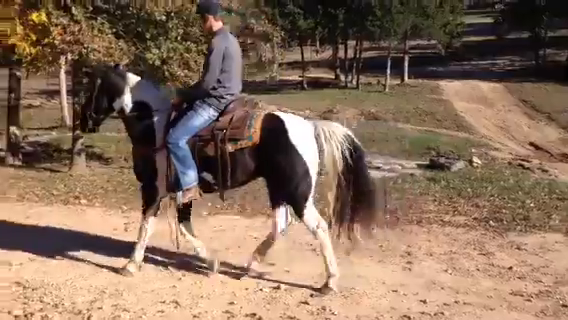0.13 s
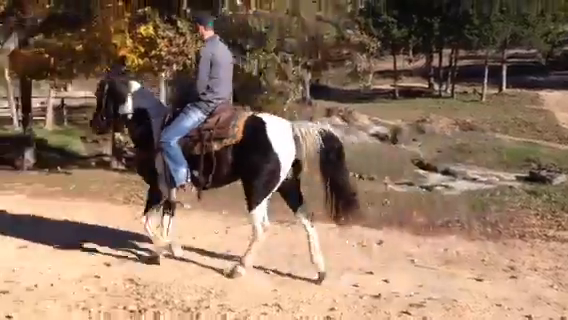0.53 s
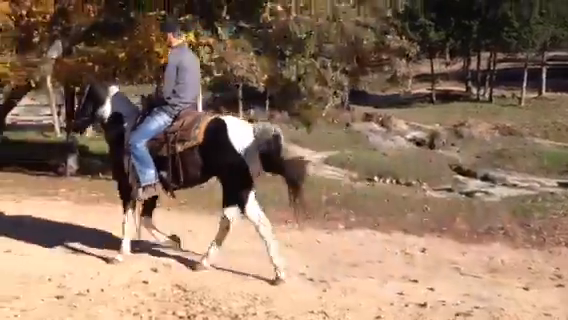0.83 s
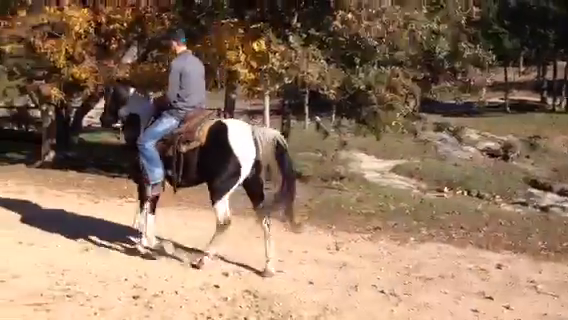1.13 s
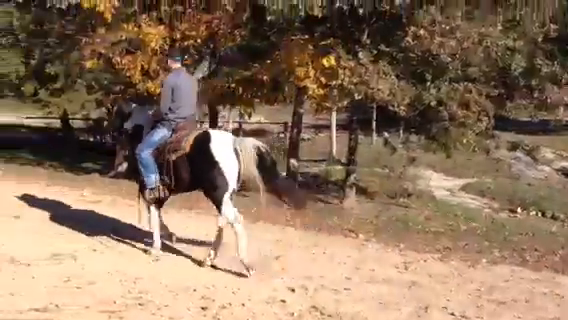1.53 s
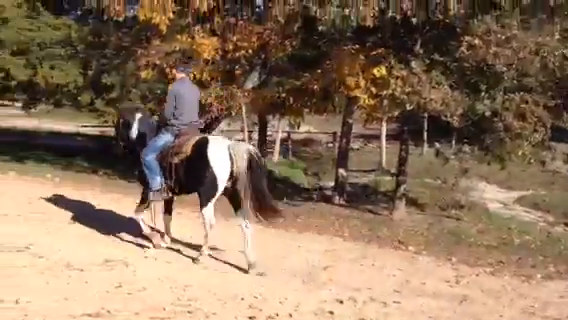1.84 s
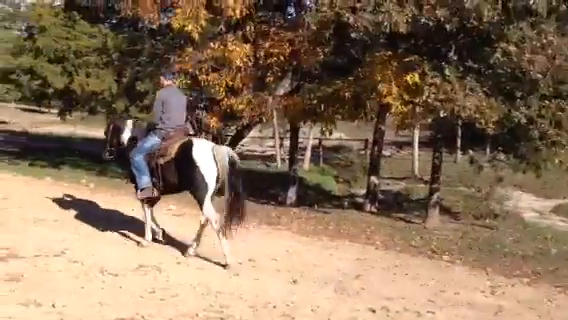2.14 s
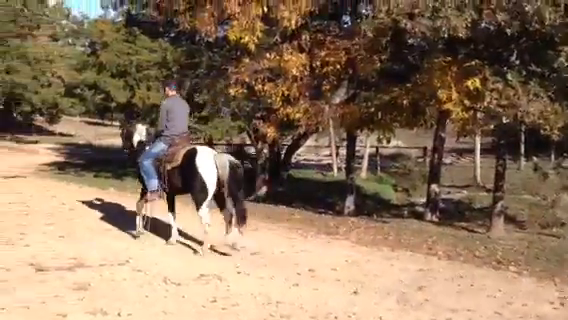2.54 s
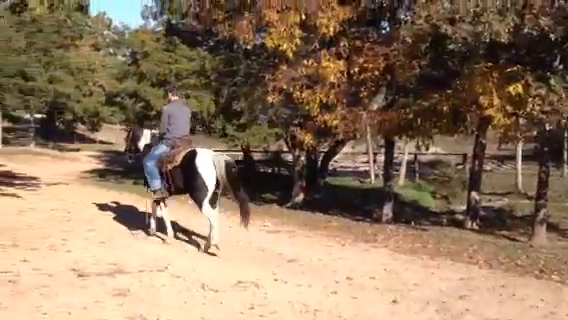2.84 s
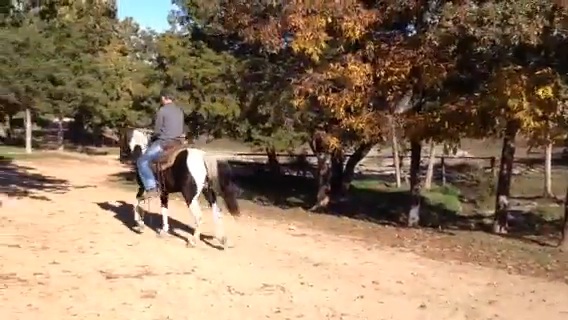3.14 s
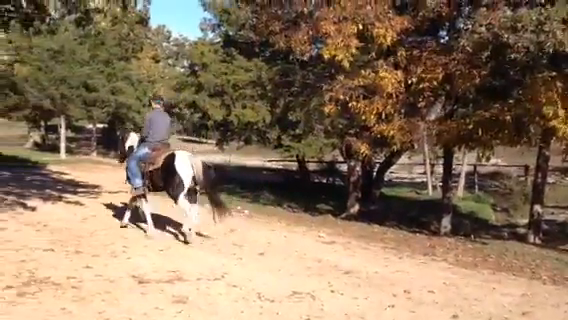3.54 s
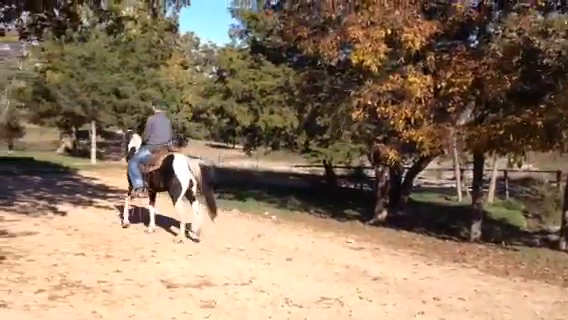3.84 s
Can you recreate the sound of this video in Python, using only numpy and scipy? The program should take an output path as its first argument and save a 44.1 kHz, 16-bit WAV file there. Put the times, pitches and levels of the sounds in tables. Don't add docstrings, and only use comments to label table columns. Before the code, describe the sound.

A horse's hooves move briskly over sand and stones, close at first, with gritty crunches, dull thuds, pebble ticks and dragging sand. Hollow knocks stand out near 0.3, 1.3 and 1.8 s, and a tiny metal tink at 0.9. Steps soften with distance, but a sharp stone crack hits at 3.1 and a knock at 3.8. Faint leaves and crickets continue; light low wind begins at 3.5.

```python
import sys
import numpy as np
from scipy import signal
from scipy.io import wavfile
from scipy.ndimage import uniform_filter1d

SR = 44100
rng = np.random.default_rng(int(sys.argv[2]) if len(sys.argv) > 2 else 0)


def put_to_file(sound):
    columns = np.atleast_2d(sound).T
    safe = np.clip(columns, -1, 1)
    whole_steps = np.round(safe * 32767)
    wavfile.write(sys.argv[1], SR, whole_steps.astype(np.int16))


def voltage_ratio(level):
    return 10 ** (np.asarray(level, float) / 20)


N = 176400


def evened(x):
    return x / np.sqrt(np.mean(x ** 2) + 1e-20)


def peaked(x):
    return x / (abs(x).max() + 1e-12)


def add(mix, s, sound):
    part = mix[round(s * SR):][:len(sound)]
    part += sound[:len(part)]


def colour(x, points):
    f, db = np.transpose(points)
    bins = abs(np.fft.fftfreq(4096, 1 / SR)) + 1
    gain = np.log(voltage_ratio(np.interp(np.log(bins), np.log(f), db)))
    taps = np.fft.ifft(np.exp(gain - 1j * signal.hilbert(gain).imag)).real[:2048]
    return signal.oaconvolve(x, taps / np.linalg.norm(taps))[:len(x)]


def resonate(x, hz, width_hz):
    turn = np.exp(2j * np.pi * np.cumsum(hz * np.ones(len(x))) / SR)
    r = np.exp(-np.pi * width_hz / SR)
    return 2 * (turn * signal.lfilter([1 - r], [1, -r], x / turn)).real


def grains(count, per_s, spread_db):
    chance, size, sign = rng.random((count, 3)).T
    return (chance < per_s / SR) * voltage_ratio(-spread_db * np.log(size + 1e-3)) * np.sign(sign - 0.5)


# f/Hz, level/dB per Hz
HUSH_SPECTRUM = [(100, -0.5), (200, 2.5), (450, -8.5), (800, -5), (2200, -11), (5200, -25), (9800, -17.5),
                 (10500, -31.5), (15500, -51)]
HUSH_DB, BREEZE_DB = -59, -58.5
BREEZE_S = 3.5


def hush():
    swell_db = evened(uniform_filter1d(rng.standard_normal(N), size=9000))
    leaves = evened(colour(rng.standard_normal(N), HUSH_SPECTRUM))
    rise = np.clip((np.arange(N) / SR - BREEZE_S) / 0.054, 0, 1)
    gust = evened(resonate(rng.standard_normal(N), 94, 41)) * rise
    return voltage_ratio(HUSH_DB + 0.96 * swell_db) * leaves + voltage_ratio(BREEZE_DB + 0.84 * swell_db) * gust


# t/s, length/s, level/dB, f/Hz
CRICKETS = [(0.052, 0.16, -66, 3780), (0.222, 0.45, -58, 4330), (.3, 0.26, -65, 4120),
            (1.261, 0.43, -58, 4296), (1.66, 0.24, -61.5, 4100), (1.852, 0.37, -61, 3935),
            (2.205, 0.33, -59, 4340), (2.483, 0.38, -59, 4230), (2.801, 0.92, -71, 4200),
            (3.243, 0.34, -58.5, 4290), (3.559, 0.33, -72, 4210), (3.76, 0.25, -53, 4253)]
TRILL_PER_S, TRILL_DEPTH, CHORUS_DB = 70, 0.38, -64


def crickets():
    far = colour(rng.standard_normal(N), [(3300, -24.0), (3800, -2.0), (4650, -4), (4950, -22.0)])
    out = voltage_ratio(CHORUS_DB) * evened(far)
    for s, length, db, hz in CRICKETS:
        noise = rng.standard_normal(int(length * SR))
        t = np.arange(len(noise)) / SR
        gate = 1 + TRILL_DEPTH * np.tanh(2 * np.sin(2 * np.pi * TRILL_PER_S * t))
        fuzz = evened(resonate(resonate(noise, hz, 180), hz, 230))
        wavering_hz = hz + 50 * evened(uniform_filter1d(noise, size=600))
        tone = np.sin(2 * np.pi * np.cumsum(wavering_hz) / SR)
        swell = np.sin(np.pi * t / length) ** 0.45
        add(out, s, voltage_ratio(db) * swell * gate * (0.69 * fuzz + tone))
    return out


# t/s, peak level/dB, f/Hz
PEBBLES = [(0.1566, -45.5, 9400), (0.216, -39, 6000), (0.2253, -39, 6230), (.265, -41, 9000),
           (.291, -44, 9500), (.351, -37.5, 1060), (.376, -47, 2200), (.4256, -55, 8700),
           (0.4403, -43, 8600), (0.47, -37.5, 1510), (0.554, -35, 5000), (0.5901, -21.5, 8540),
           (.5955, -38, 1390), (0.7876, -46, 10000), (0.8235, -45, 8400), (0.823, -44, 704),
           (.901, -33, 2300), (1.3933, -34.5, 4100), (1.5775, -44, 11000), (1.0881, -47, 10400),
           (1.1015, -49, 12000), (1.1078, -34.5, 3450), (1.137, -61, 11300), (1.201, -42, 8050),
           (1.2765, -27, 8200), (1.467, -41, 9400), (1.7411, -56, 3000), (1.7932, -23, 2600),
           (1.804, -39, 6500), (1.813, -29, 1800), (1.8203, -31, 744), (1.8803, -42, 9000),
           (1.892, -56, 1300), (1.911, -54, 13500), (1.938, -46, 8450), (1.945, -42, 1500),
           (2.028, -42, 2500), (2.0832, -31, 8600), (2.0835, -37, 1980), (2.205, -37, 2460),
           (2.469, -48, 4500), (2.514, -39, 880), (2.889, -42.5, 2000), (3.155, -29, 1320),
           (2.3444, -44, 2010), (2.364, -44, 2000), (2.559, -52, 8000), (3.173, -36, 4300),
           (3.358, -48, 8360), (3.5071, -43, 8900), (3.729, -41.5, 2000), (3.735, -42, 3500),
           (3.789, -42, 2000), (3.8, -38, 2220), (3.901, -39.5, 2500), (3.962, -61, 4930)]
BRIGHT_HZ = 9000


def pebbles():
    out, t = np.zeros(N), np.arange(400) / SR
    for s, db, hz in PEBBLES:
        tap = rng.standard_normal(len(t)) * np.exp(-t / 0.00057)
        ring = resonate(resonate(tap, hz, 350 + 0.086 * hz), hz, 1.0 * hz + 600)
        snap = 0.11 * (hz / BRIGHT_HZ) ** 2 * peaked(np.diff(tap, prepend=0))
        add(out, s, voltage_ratio(db) * peaked(peaked(ring) + snap))
    return out


WALL_TOP_HZ = 2500


def hoof(x, hz):
    low = resonate(resonate(x, hz, 0.19 * hz), hz, 4.5 * hz)
    wall = resonate(resonate(x, 0.5 * hz, 960), min(2.4 * hz, WALL_TOP_HZ), 1240)
    return peaked(peaked(low) + 0.59 * peaked(wall))


# t/s, peak level/dB, hoof ring f/Hz, grit level/dB
CRUNCHES = [(0.189, -26.5, 867, -21), (0.196, -28, 1670, -7), (0.257, -31.5, 754, -24),
            (0.5094, -34, 690, -8), (0.515, -35, 770, -1.5), (0.533, -27, 735, -18),
            (0.573, -27.5, 870, -20), (0.592, -29.5, 1470, -8.5), (0.613, -37.5, 910, -5),
            (0.845, -37.5, 1530, -2), (0.849, -29, 810, -6.5), (0.9, -30.5, 800, -21),
            (0.942, -29, 770, -14), (0.952, -36, 990, -11), (0.959, -30.5, 750, -11),
            (1.013, -38.5, 735, -13.5), (1.043, -36.5, 666, -12), (1.1, -38, 2460, -39),
            (1.169, -31.5, 1920, -48), (1.174, -25.5, 1950, -41), (1.235, -28.5, 1640, -33),
            (1.392, -32, 845, -20), (1.492, -35.5, 830, -13), (1.519, -37.5, 1550, -24),
              (1.564, -31.5, 780, -12.5), (1.624, -28, 740, -11), (1.868, -34.5, 830, -22),
              (2.035, -38.5, 1350, -7.5), (2.081, -43.5, 1880, -13), (2.108, -31, 1880, -17.5),
              (2.118, -37, 1930, -18), (2.195, -31.5, 820, -12), (2.2504, -33, 860, -6.5),
              (2.2564, -27, 620, -31), (2.295, -36, 880, -12), (2.501, -33, 640, -13),
              (2.581, -44, 1480, -10), (2.603, -31, 720, -14.5),
            (2.736, -40, 988, -15), (2.755, -42.5, 1180, -2.5), (2.825, -43.5, 1900, -7),
              (2.88, -39.5, 1190, -3), (3.037, -36, 1210, -14), (3.048, -32.5, 2220, -9),
              (3.144, -30, 1260, -5), (3.157, -27, 750, -5), (3.211, -34, 1190, -34),
              (3.364, -37, 1920, -19), (3.397, -38.5, 647, -2.5), (3.427, -41.5, 614, -5),
              (3.502, -44, 764, -13), (3.529, -36.5, 726, -26), (3.709, -36.5, 1800, -9.5),
              (3.832, -28.5, 990, -29), (3.863, -33.5, 1120, -12)]
# f/Hz, level/dB per Hz
GRIT = [(600, 9), (2300, 5.5), (4200, 19.5), (6000, 7.5), (9700, 15.5), (11000, 0.5), (13600, 7),
        (15500, -23)]
CRUNCH_S = 0.0052


def crunches():
    ring, grit, t = np.zeros(N), np.zeros(N), np.arange(SR // 20) / SR
    u = t / CRUNCH_S
    shape = np.minimum(u / 0.51, 1) * (np.exp(-u ** 2) + 0.44 * np.exp(-u / 2.8))
    for s, db, hz, grit_db in CRUNCHES:
        clump = np.tanh(grains(len(t), per_s=6800, spread_db=4.0) / 1.54) * shape
        hiss = clump * 0.97 + 0.34 * shape * rng.standard_normal(len(t))
        add(ring, s - 0.0015, voltage_ratio(db - 0.5) * hoof(clump, hz))
        add(grit, s - 0.001, voltage_ratio(db + grit_db + 5) * peaked(hiss))
    return ring + colour(grit, GRIT)


# t/s, peak level/dB, f/Hz
THUDS = [(0.192, -45.5, 310), (0.296, -44.5, 347), (0.44, -38, 302), (0.753, -47.5, 345), (0.847, -40, 205),
         (0.95, -42, 243), (1.058, -48.5, 270), (1.291, -40, 225), (1.49, -47, 215), (1.734, -40, 268),
         (1.923, -45.5, 285), (2.253, -43, 174), (2.418, -52, 200), (2.567, -48.5, 269), (2.953, -50, 198),
         (3.049, -46, 238), (3.582, -52, 407), (3.712, -37.5, 185)]


def thuds():
    out, t = np.zeros(N), np.arange(SR // 10) / SR
    for s, db, hz in THUDS:
        push = np.sin(2 * np.pi * hz * t * (1 - 0.41 * t)) * np.exp(-t / 0.013)
        noise = rng.standard_normal(len(t))
        rumble = evened(resonate(noise, 0.71 * hz, 72)) * np.exp(-t / 0.025)
        body = evened(resonate(resonate(noise, 550, 180), 550, 260)) * np.exp(-t / 0.021)
        onset = np.minimum(t / 0.0024, 1)
        add(out, s, voltage_ratio(db + 3.0) * onset * (1.2 * push + 0.5 * rumble + 0.24 * body))
    return out


# t/s, length/s, coarse level/dB, fine spray level/dB
DRAGS = [(0.203, 0.28, -49, -60), (0.509, 0.15, -42, -51.5), (0.837, 0.12, -46.5, -51),
         (1.1, 0.31, -43.5, -54.5), (1.485, 0.27, -54.5, -56), (1.785, 0.18, -43.5, -51.5),
         (2.067, 0.6, -51, -60), (2.417, 0.063, -50.5, -56), (2.555, 0.069, -48, -54.5),
         (0.663, 0.047, -60, -64), (2.715, 0.65, -56.5, -65), (3.106, 0.1, -41.5, -39),
         (3.355, 0.12, -53.5, -56.5), (3.497, 0.056, -43, -48.5), (3.783, 0.18, -47, -58)]
# f/Hz, level/dB per Hz
SAND = [(150, 5), (400, -2.5), (850, -2), (2300, -2), (3300, -19), (4500, -10.5), (6000, -20), (15500, -27)]


def drags():
    t, coarse, fine = np.arange(N) / SR, np.zeros(N), np.zeros(N)
    for s, length, db, fine_db in DRAGS:
        u = np.maximum(t - s, 0) / length
        stroke = voltage_ratio(-8.0 * u ** 0.48) * np.minimum(u * length / 0.0056, 1) / (1 + u ** 6)
        coarse += voltage_ratio(db) * stroke
        fine += voltage_ratio(fine_db) * stroke
    lumps = voltage_ratio(3 * evened(uniform_filter1d(rng.standard_normal(N), size=400)))
    contacts = evened(np.tanh(grains(N, per_s=5000, spread_db=4.5) / 6))
    sand = lumps * (contacts + 0.61 * rng.standard_normal(N))
    return coarse * evened(colour(sand, SAND)) + fine * evened(colour(sand[::-1], GRIT))


# t/s, peak level/dB, f/Hz
KNOCKS = [
    (0.226, -25.5, 990),
    (0.2998, -18.5, 1020),
    (1.297, -19.5, 980),
    (1.7965, -18, 1580),
    (1.9292, -27.5, 730),
    (2.421, -29.5, 850),
    (3.1317, -26, 2930),
    (3.8411, -23, 1120),
]
LEAD_S = 0.008


def knocks():
    ring, grit, t = np.zeros(N), np.zeros(N), np.arange(SR // 20) / SR
    for s, db, hz in KNOCKS:
        blow = (t >= LEAD_S) * np.exp(-abs(t - LEAD_S) * SR / 2)
        crushed = np.tanh(grains(len(t), per_s=2100, spread_db=5.0) / 3)
        blow = blow + 0.6 * crushed * np.exp(-abs(t - LEAD_S - 0.001) / 0.005)
        add(ring, s - LEAD_S, voltage_ratio(db) * hoof(blow, hz))
        add(grit, s - LEAD_S, voltage_ratio(db - 1) * blow)
    return ring + colour(grit, GRIT)


def struck(modes, scatter_s):
    t = np.arange(6000) / SR
    ring = sum(voltage_ratio(db - 60 * t / t60) * np.sin(2 * np.pi * hz * t) for hz, db, t60 in modes)
    hits = rng.standard_normal(400) * np.exp(-t[:400] / scatter_s)
    return peaked(np.convolve(ring, hits))


# f/Hz, level/dB, t60/s
BIT = [(8716, 11, 0.06), (8690, -10, 0.2), (12100, -3, .035), (13400, -3, 0.03)]
BIT_S, BIT_DB = 0.904, -37


def bit_tink():
    out = np.zeros(N)
    add(out, BIT_S, voltage_ratio(BIT_DB) * struck(BIT, 0.00012))
    return out


# f/Hz, level/dB, t60/s
STONE = [(1800, -17, 0.0067), (2450, 1.5, 0.012), (3800, 6.5, 0.014), (4500, 6.5, 0.015),
         (6500, -11, 0.0023), (9400, -0.5, 0.0091)]
STONE_S, STONE_DB = 3.1093, -12.5


def stone_crack():
    out = np.zeros(N)
    add(out, STONE_S, voltage_ratio(STONE_DB) * struck(STONE, 0.0007))
    add(out, STONE_S + 0.003, voltage_ratio(STONE_DB - 8) * struck(STONE, 0.002))
    add(out, STONE_S + 0.0075, voltage_ratio(STONE_DB - 12) * struck(STONE, 0.0005))
    return out


def scene():
    background = hush() + crickets()
    near = pebbles() + crunches() + thuds() + knocks() + bit_tink() + stone_crack()
    t = np.arange(6000) / SR
    tail = grains(len(t), per_s=2000, spread_db=3.5) * voltage_ratio(-60 * t / 0.1) * (t > 0.003)
    wet = voltage_ratio(-18.5) * signal.oaconvolve(near, tail / np.linalg.norm(tail))[:N]
    return (near + wet + drags() + background)[None]


# f/Hz, level/dB
TREBLE = [(1000, -1), (4750, 0), (5100, -2), (5800, 2), (10200, -1), (11200, 0.5), (13900, -1.5),
          (14600, -4.5), (15500, -8)]
LOW_CUT_HZ, EDGE_HZ = 194, 15500
START_S = 0.0845


def microphone(dry):
    bass_cut = signal.butter(2, LOW_CUT_HZ, "high", fs=SR, output="sos")
    heard = signal.sosfilt(bass_cut, dry)
    heard = voltage_ratio(-1.59) * colour(heard[0], TREBLE)[None]
    heard = signal.oaconvolve(heard, signal.firwin(301, EDGE_HZ, fs=SR)[None], "same")
    return heard * (np.arange(N) / SR > START_S)


def low_pass(x):
    return signal.sosfilt(signal.butter(12, 16290, fs=SR, output="sos"), x)


def record(dry):
    mix = microphone(dry)
    return low_pass(mix)


dry = scene()
out = record(dry)
put_to_file(out)
```